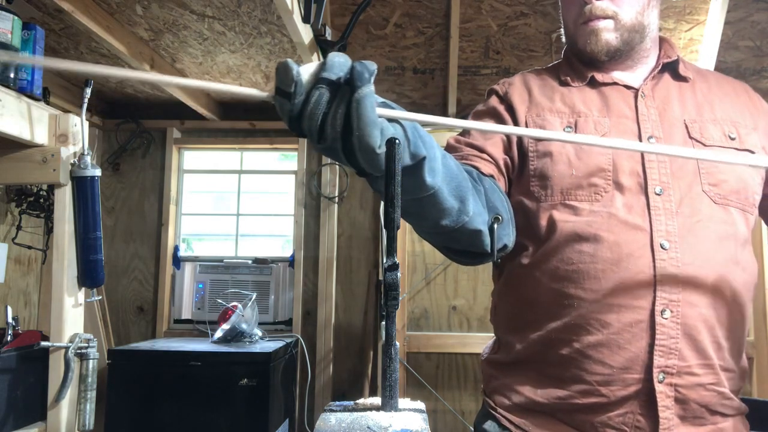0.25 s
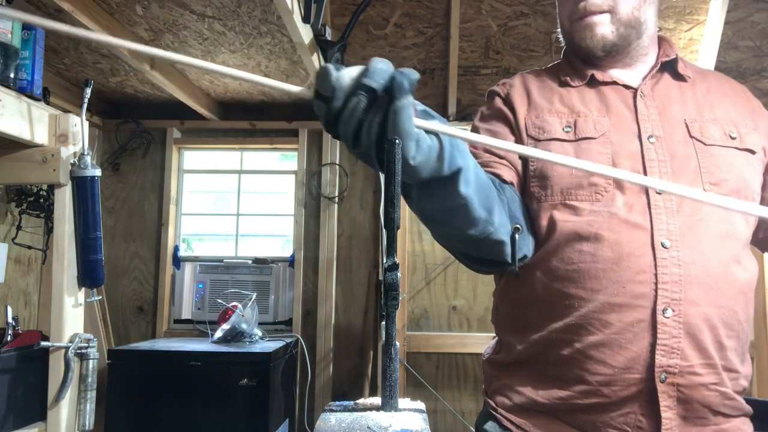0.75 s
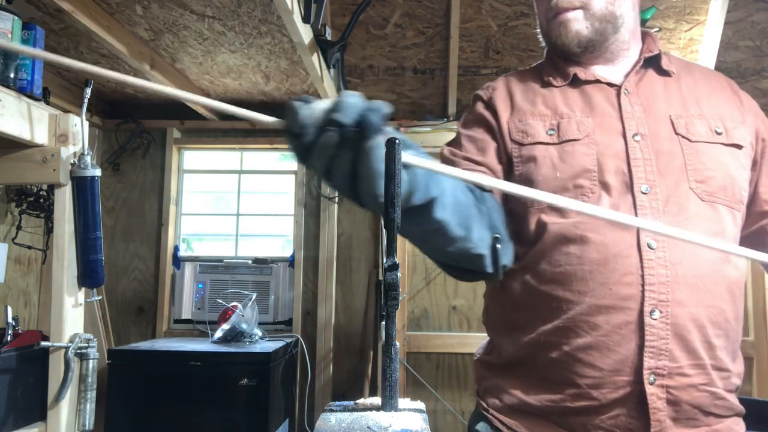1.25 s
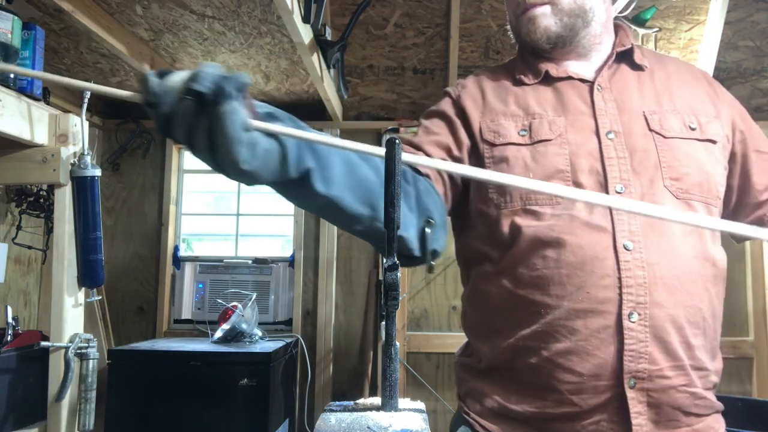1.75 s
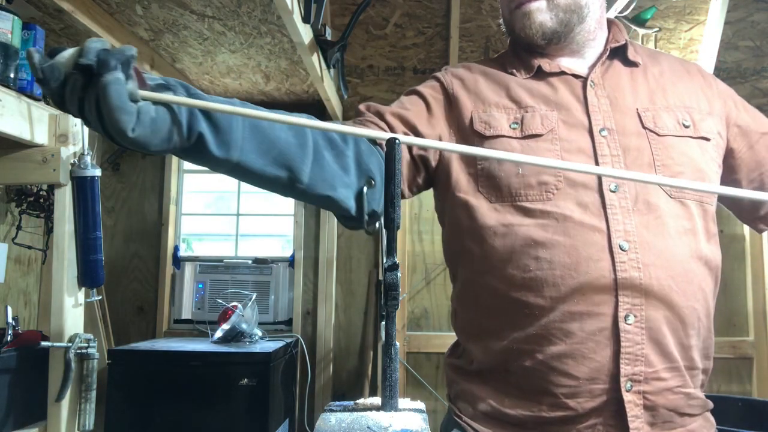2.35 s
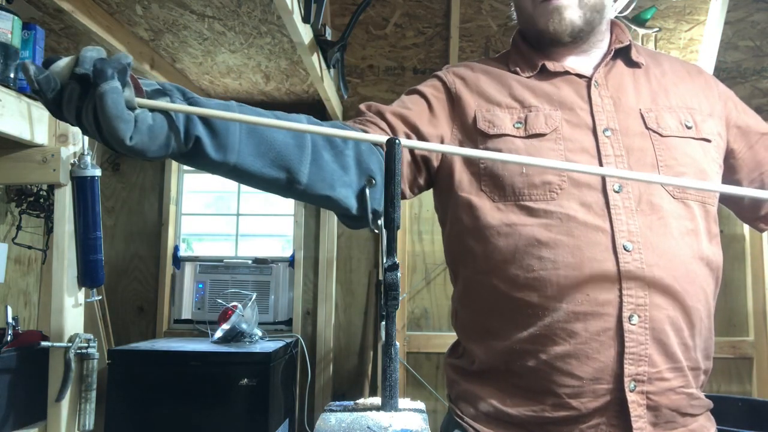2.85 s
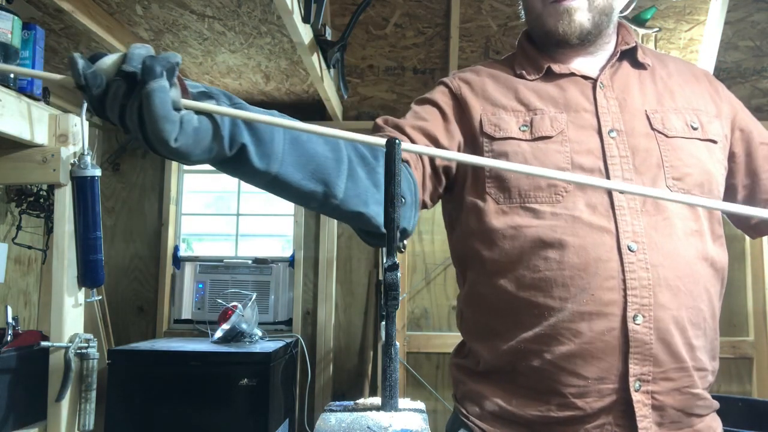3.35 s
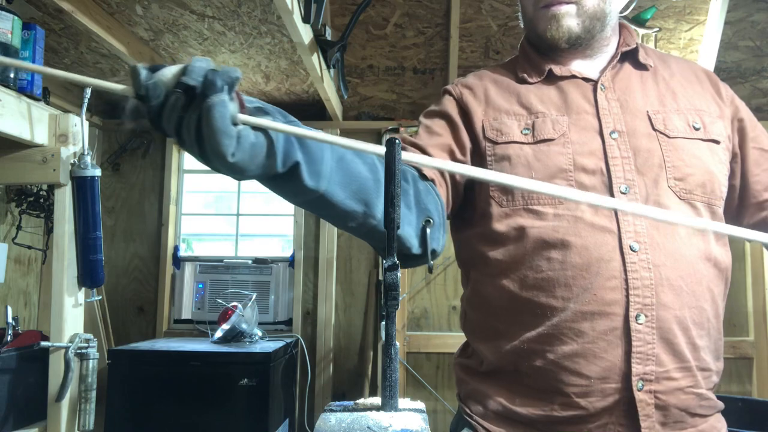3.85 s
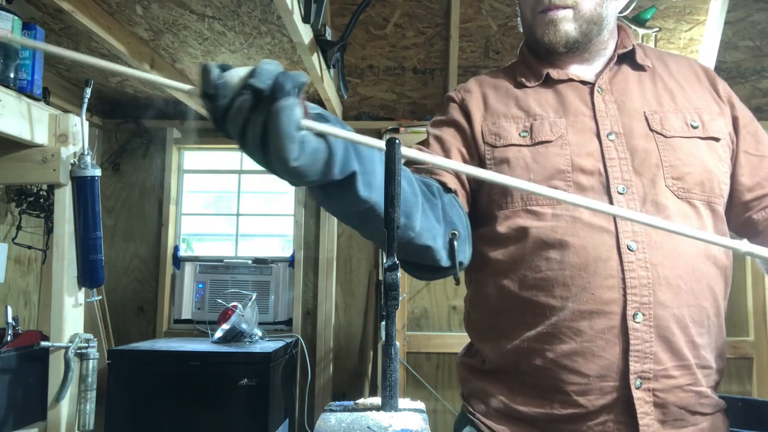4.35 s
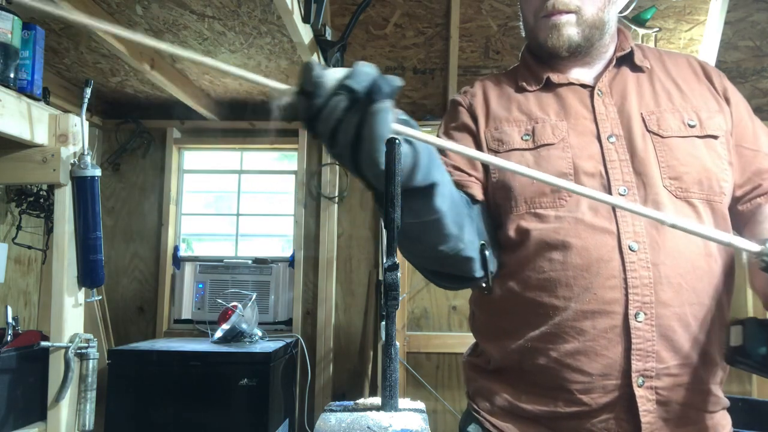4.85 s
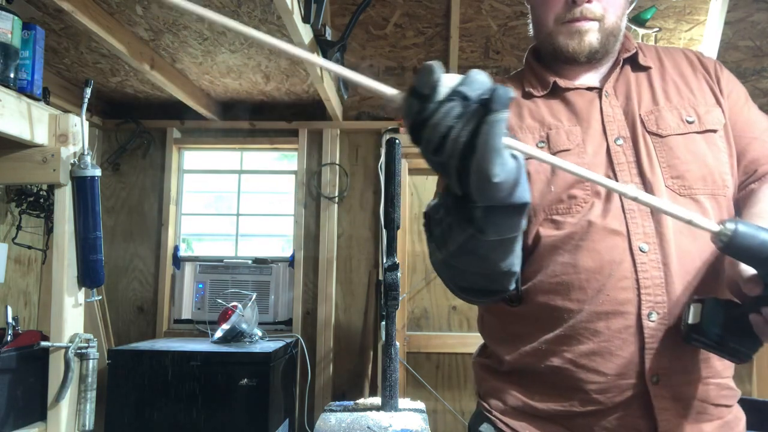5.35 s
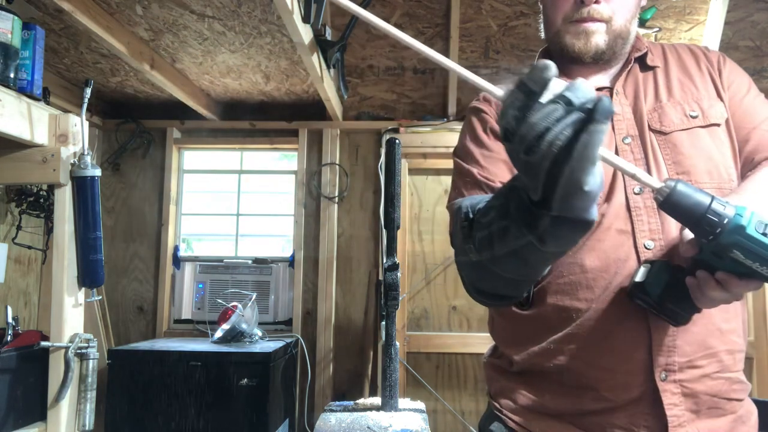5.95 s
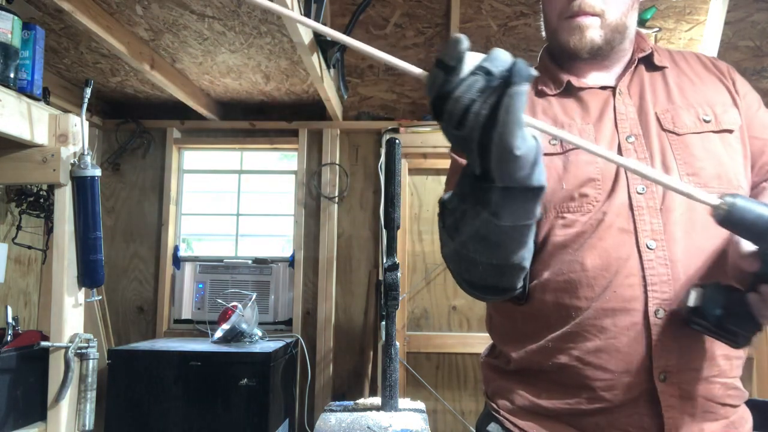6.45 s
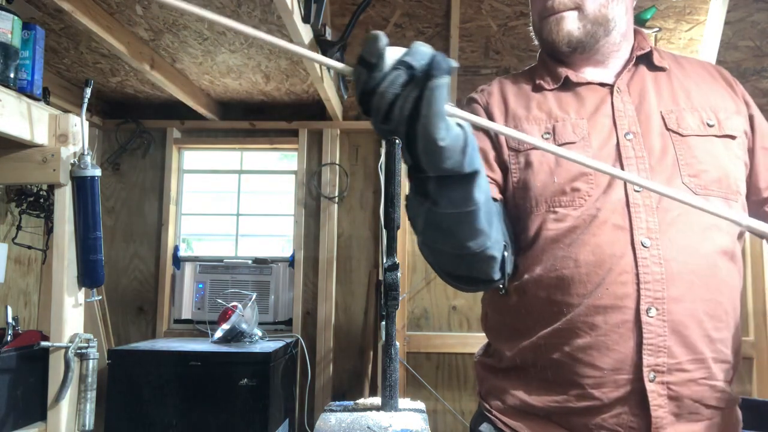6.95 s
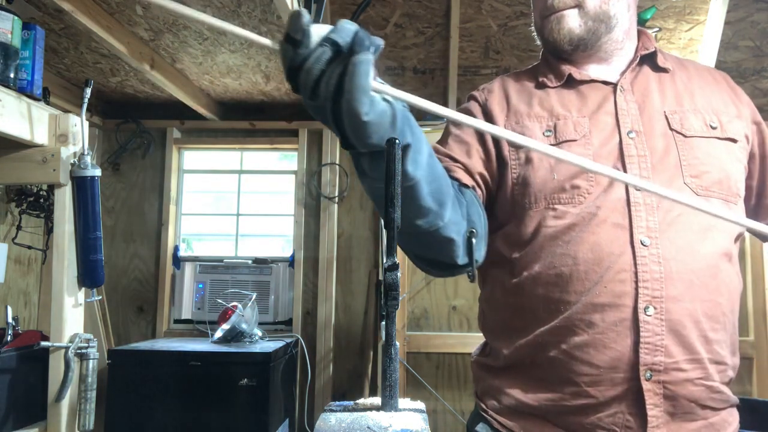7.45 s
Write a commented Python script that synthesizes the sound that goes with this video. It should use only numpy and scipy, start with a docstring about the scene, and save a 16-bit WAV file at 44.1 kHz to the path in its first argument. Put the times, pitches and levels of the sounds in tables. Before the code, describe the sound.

Close up in a small wooden workshop, a short whir of a cordless drill cuts off, and the dowel and chuck tick and knock lightly. With a clack the drill starts again and keeps running, its high gear whine swelling and fading over the gritty hiss and woody rasp of sandpaper sliding along the spinning dowel. A tiny rising chirp passes, and the drill grows a little louder, with a brief shrill scrape.

```python
"""A cordless drill spins a long wooden dowel against sandpaper in a gloved hand, in a small wooden shed.
It stops almost at once; the glove scuffs and the dowel and chuck knock lightly. About a second in,
the gears catch with a clack and run on, whirring and whining with the motor's speed, while the grit
hisses and the wood rasps. A thin chirp rises just after four seconds, and the scrape turns briefly
shrill as the hand nears the chuck."""
import sys
import numpy as np
from scipy import signal
from scipy.fft import rfft, irfft, next_fast_len
from scipy.io import wavfile
from scipy.ndimage import map_coordinates

SR = 44100
rng = np.random.default_rng(int(sys.argv[2]) if len(sys.argv) > 2 else 0)


def transcribe(signal):
    """Save signal, clipped to [-1, 1], as a 16-bit WAV file at the path in sys.argv[1]."""
    frames = np.atleast_2d(signal).T
    limited = np.clip(frames, -1, 1)
    pcm = np.round(limited * 32767).astype(np.int16)
    wavfile.write(sys.argv[1], SR, pcm)


N = 340011

# the motor's pitch at full trigger and its gear-mesh whine: time_s, shaft_hz, whine_db
MOTOR_RUN = [(1.25, 313, -48), (1.6, 316.6, -46), (1.85, 317.8, -37.5), (2.4, 318.8, -37.5),
             (2.68, 320.2, -36.8), (2.92, 316.6, -42.5), (3.2, 316.9, -37.5), (3.62, 315.5, -45),
             (3.8, 314.9, -39.5), (3.95, 314.3, -46), (4.61, 313, -52), (4.68, 313.5, -37),
             (5.2, 314.6, -33), (5.45, 311.8, -37.5), (5.75, 313.7, -42), (6.08, 308.6, -42.5),
             (6.3, 312.2, -39), (6.7, 313.4, -34.3), (7, 312.3, -36), (7.15, 311.6, -48)]
# how squarely the drill's housing faces the listener: time_s, gain_db
FACING = [(0, -4.5), (3.3, -4.5), (4.55, -5), (4.85, 1.5), (5.45, 1.5), (7.7, -4.5)]


def motor():
    """The motor follows the trigger with inertia; gives its share of full speed and its turns so far."""
    # moves of the trigger finger: start_s, speed_share
    trigger = [(-1, .87), (0.3124, 0.0053), (1.1058, 1), (4.5, .885), (4.5, 1)]
    spin_up_s, coast_s = .034, .04
    t = np.arange(N) / SR
    speed, before = np.zeros(N), 0
    for start_s, share in trigger:
        lag_s = spin_up_s if share > before else coast_s
        speed += (share - before) * (1 - np.exp(-np.maximum(t - start_s, 0) / lag_s))
        before = share
    speed = np.clip(speed, 0, 1)
    shaft_hz, _ = curves(MOTOR_RUN)
    return speed, np.cumsum(speed * shaft_hz) / SR


def gearbox(turns):
    """Gear teeth whirr, louder under load, and ring the drill's housing."""
    # tone colour of the teeth: freq_hz, level_db
    gear_colour = [(60, -40), (130, -26.5), (250, -30), (420, -16), (900, -10.5), (1700, -3), (2080, -3.5),
                   (2350, -2), (2800, -1.5), (3500, 0), (4400, 0), (4950, 1), (5700, -1), (6800, -3),
                   (9000, -42)]
    # resonances of the housing: pitch_hz, width_hz, level_db
    housing_modes = [(305, 32, -10), (632, 46, -9.5), (1014, 87, -0.5), (1864, 190, 2), (2744, 98, -4),
                     (3950, 260, -3), (4610, 170, 0.5), (4970, 440, 2)]
    facing_db, = curves(FACING)
    # the teeth strike harder once in each turn of the motor
    beat = amp(0.53 * np.cos(2 * np.pi * turns) + 0.72 * wobble(70))
    whirr = coloured(beat * grains(rate=12000, spread_db=1.0), gear_colour)
    housing = ringing(beat * grains(rate=9000, spread_db=0.5), housing_modes)
    housing = unit(below(housing, corner_hz=9000))
    return amp(pressure_db() - 32) * whirr + amp(facing_db - 35.5) * housing


def whine(turns):
    """Gear mesh, shaft and planets sing at multiples of the motor's speed; backlash makes them flutter."""
    # tones of the motor and planet gears: shaft_multiple, level_db
    orders = [(1, -60.5), (2, -59.5), (2.55, -59), (4, -65), (5, -47), (5.73, -52), (5.8, -50.5),
              (5.93, -50.5), (6, -47.5), (8.6, -55), (13, -63), (21.72, -50), (22.97, -54), (24, -48)]
    teeth = 12
    _, whine_db = curves(MOTOR_RUN)
    facing_db, = curves(FACING)
    flutter_db = 1.3 * wobble(18) + 1.2 * wobble(80)
    slip = .35 * wobble(40) + .1 * wobble(170)
    mesh = amp(whine_db + flutter_db) * np.sin(2 * np.pi * teeth * turns + slip)
    tones = sum(amp(db + 3.2 * wobble(14)) * np.sin(2 * np.pi * order * turns + 0.53 * wobble(22))
                for order, db in orders)
    return np.sqrt(2) * (mesh + amp(facing_db - 2) * tones)


def sanding(speed, turns):
    """Sandpaper scratches the spinning dowel as the hand slides along it."""
    # the hand's place, 0 near the chuck to 1 at arm's length: time_s, reach
    hand_path = [(1.2, .09), (2.2, .95), (3.2, 0.9), (4, 0.55), (5.8, 0.042), (7.7, 0.39)]
    reach, = curves(hand_path)
    # the slightly bent dowel presses on the paper once in each of its geared-down turns
    gear_ratio = 15
    sway_db = 0.5 * np.sin(2 * np.pi * turns / gear_ratio) + 0.41 * wobble(25)
    return amp(sway_db) * (wood_rasp(reach) + paper_hiss(speed, reach) + shrill_scrape())


def wood_rasp(reach):
    """The dowel's bending modes rasp and boom; the hand's place changes which of them ring."""
    # the wood's colour, hand near the chuck: freq_hz, level_db
    near_colour = [(30, -47), (110, -25), (190, -16), (280, -7.5), (380, -17), (650, -2.5), (880, -3.5),
                   (1020, 4.5), (1120, -2), (1250, 7.5), (1480, 0.5), (1750, -1), (2100, -10), (4000, -36)]
    # the wood's colour, hand far out: freq_hz, level_db
    far_colour = [(30, -48), (110, -26), (190, -19.5), (285, -4.5), (400, -15.5), (600, -8), (850, -3),
                  (1000, 2), (1130, -3.5), (1350, 0.5), (1680, 5.5), (2100, -6.5), (2350, 6.5), (2800, -27)]
    # strength of the rasp: time_s, level_db
    rasp = [(0, -34.5), (.25, -31.5), (1.2, -31), (1.48, -30.6), (2.1, -36.5), (2.85, -32), (3.1, -34),
            (4.25, -29.5), (4.6, -32.4), (4.9, -31.5), (5.1, -34), (5.4, -30.7), (5.78, -34), (6, -31),
            (7.03, -38), (7.35, -34)]
    normal_db = -33
    rasp_db = curves(rasp)[0] - normal_db
    near = coloured(grains(rate=7000, spread_db=1.5), near_colour)
    far = coloured(grains(rate=7000, spread_db=1.5), far_colour)
    chatter = amp(.6 * wobble(30))
    dowel = chatter * (np.sqrt(1 - reach) * near + np.sqrt(reach) * far)
    # the dowel rings more freely far from the chuck
    wood_db = -38.5 + 1.23 * rasp_db + 2.5 * reach
    # its lowest modes boom almost regardless of the rasp
    boom = below(dowel, corner_hz=540)
    boom_db = -37.5 + .3 * rasp_db + 2 * reach
    return amp(wood_db) * (dowel - boom) + amp(boom_db) * boom


def paper_hiss(speed, reach):
    """Grit and fine dust hiss, louder under pressure; a quicker dowel sounds brighter."""
    # the grit's coarse hiss: freq_hz, level_db
    grit_colour = [(2000, -33.5), (5000, -20.5), (5900, -4), (6300, 1), (6850, 2), (7450, -1.5),
                   (7950, -6.5), (8200, -11.5), (9500, -32)]
    # the dust's fine hiss: freq_hz, level_db
    dust_colour = [(5000, -43), (8200, 2), (9000, 2.5), (9500, 4.5), (10400, 3.5), (11000, -1),
                   (12100, -10), (13700, -12), (15700, -37)]
    press_db = pressure_db()
    grit_db = -33.5 + 1.05 * press_db + 0.43 * wobble(50)
    dust_db = -45.4 + .7 * press_db + 2 * reach  # shaded when the hand is near the body
    grit = amp(grit_db) * coloured(grains(rate=9000, spread_db=1.0), grit_colour)
    dust = amp(dust_db) * coloured(grains(rate=16000, spread_db=2.0), dust_colour)
    return speed ** 0.52 * grit + speed * dust


def shrill_scrape():
    """The scrape rings one high resonance as the hand nears the chuck."""
    # the shrill swell: middle_s, length_s, level_db
    swell = [(5.53, .7, -34.5)]
    # its resonance: pitch_hz, width_hz, level_db
    mode = [(5000, 420, 0)]
    scrape = ringing(grains(rate=9000, spread_db=3.0), mode)
    return swells(swell) * unit(below(scrape, corner_hz=9000))


def pressure_db():
    """How hard the hand presses the paper on, in dB above normal."""
    # the hand's pressure: time_s, level_db
    pressure = [(0, -28.5), (.3, -29.5), (1.2, -26.5), (1.58, -25.5), (2.1, -30), (2.62, -31.5),
                (2.85, -30.5), (3.75, -28), (4.2, -27.5), (4.55, -29), (4.78, -27.5), (5.15, -29),
                (7.1, -29.5), (7.5, -28)]
    normal_db = -29
    return curves(pressure)[0] - normal_db


def gear_clack():
    """The gears take up their slack with a clack, and the teeth chatter on after it."""
    # resonances of the catching gears: pitch_hz, width_hz, level_db
    clack_modes = [(650, 220, -1), (1400, 450, 2), (2050, 360, 4.5), (5000, 1500, -14), (6760, 830, -14)]
    start_s, muffle_hz = 1.0878, 5500
    strike = amp(5.5) * burst(start_s, t60_s=.012)
    rattle = amp(4) * burst(start_s, t60_s=.2)
    clack = ringing(strike + rattle, clack_modes)
    return filtered(clack, lambda hz: 1 / (1 + (hz / muffle_hz) ** 2))  # the gear case dulls the top


def knocks():
    """Dowel and chuck knock lightly while the drill rests: a bright tick, a dry crack and a low body."""
    # the knocks: start_s, strength_db, body_gain_db
    hits = [(.447, -46, -18), (.471, -36, -24), (.478, -41, -16), (.507, -46, -18), (.548, -33.5, -16),
            (.566, -46, -18), (.676, -58, -7), (.689, -46, -14), (0.736, -43, -20), (0.987, -66, -4)]
    # the tick's resonances: pitch_hz, width_hz, level_db
    tick_modes = [(2600, 380, -5), (4960, 210, 4), (6120, 160, 1), (7000, 220, 1), (7600, 250, -6),
                  (9400, 380, -9)]
    # the crack's colour: freq_hz, level_db
    crack_colour = [(500, -12), (2500, -2), (7500, 0), (11000, -10), (15000, -28)]
    # the body's resonances: pitch_hz, width_hz, level_db
    body_modes = [(620, 120, -8), (1020, 100, 7.5), (1500, 250, 2), (1950, 250, 5)]
    blows, body_blows = np.zeros(N), np.zeros(N)
    for start_s, strength_db, body_gain_db in hits:
        blow = amp(strength_db) * burst(start_s, t60_s=0.0097)
        blows += blow
        body_blows += amp(body_gain_db) * blow
    tick = amp(22.5) * ringing(blows, tick_modes)
    crack = amp(11.5) * filtered(blows, lambda hz: amp(along(crack_colour, hz)))
    body = amp(34.5) * ringing(body_blows, body_modes)
    return tick + crack + body


def glove_scuffs():
    """The paper scuffs faintly on the resting dowel as the glove shifts its grip."""
    # shifts of grip: middle_s, length_s, level_db
    shifts = [(.5, 0.27, -58), (.72, .13, -65), (1.02, .07, -74)]
    # the scuff's colour: freq_hz, level_db
    scuff_colour = [(200, -7), (700, -1), (2000, -8), (3000, -13), (7000, -6), (12000, -29)]
    friction = amp(2.8 * wobble(59.7)) * grains(rate=1700, spread_db=1.5)
    return swells(shifts) * coloured(friction, scuff_colour)


def chirp():
    """A thin, brief tone climbs away above the mesh whine."""
    # the chirp's swell: middle_s, length_s, level_db
    swell = [(4.35, .14, -41)]
    middle_s, middle_hz, rise_hz_per_s = swell[0][0], 4080, 2800
    hz = middle_hz + rise_hz_per_s * (np.arange(N) / SR - middle_s)
    phase = 2 * np.pi * np.cumsum(hz) / SR + .5 * wobble(120)
    return swells(swell) * np.sqrt(2) * np.sin(phase)


def shed_echo(x):
    """Close wooden walls answer; the echo crossfades from tail to tail as the worker moves."""
    # the shed's decay: freq_hz, t60_s
    decay = [(150, 0.25), (1500, 0.2), (6000, 0.1), (14000, 0.32)]
    tail_count, delay_samples = 16, 130
    hz, t, noise = signal.stft(rng.standard_normal((tail_count, SR // 3)), SR, nperseg=256)
    fade = amp(-60 * t / along(decay, hz)[:, None])
    _, tails = signal.istft(noise * fade, SR, nperseg=256)
    tails /= np.linalg.norm(tails, axis=1, keepdims=True)
    place = np.linspace(0, tail_count - 1, N)
    shares = np.sqrt(np.clip(1 - np.abs(place - np.arange(tail_count)[:, None]), 0, 1))
    delayed = np.pad(x, (delay_samples, 0))[:N]
    return signal.oaconvolve(shares * delayed, tails, axes=1).sum(axis=0)[:N]


def room_tone():
    """Still air in the shed, with a steady hum and a faint whistle."""
    # hum and whistle: pitch_hz, level_db
    tones = [(107.7, -80.5), (8683, -96), (9090, -100)]
    # the air's colour: freq_hz, level_db
    air_colour = [(25, -35), (58, -3), (85, -7), (106, -7.5), (160, -9.5), (264, -9), (600, -10.5),
                  (1200, -16.5), (2780, -25.5), (6720, -24), (8000, -29), (10500, -34), (15000, -41)]
    t = np.arange(N) / SR
    hum = sum(amp(db) * np.sqrt(2) * np.sin(2 * np.pi * hz * t + .5 * wobble(10)) for hz, db in tones)
    return hum + amp(-68.5) * coloured(rng.standard_normal(N), air_colour)


def grains(rate, spread_db):
    """Random tiny impacts of uneven size, rate a second, at rms 1."""
    hit = rng.random(N) < rate / SR
    return unit(hit * rng.standard_normal(N) * amp(spread_db * rng.standard_normal(N)))


def burst(start_s, t60_s):
    """A decaying burst of contact noise, at energy 1."""
    t = np.arange(N) / SR - start_s
    x = (t >= 0) * amp(-60 * np.clip(t / t60_s, 0, 10)) * rng.standard_normal(N)
    return x / np.linalg.norm(x)


def swells(rows):
    """Gain of smooth swells, each 12 dB down at its two ends."""
    t = np.arange(N) / SR
    return sum(amp(db - 12 * (2 * (t - middle_s) / length_s) ** 2) for middle_s, length_s, db in rows)


def wobble(rate):
    """A smooth random curve, rate knots a second."""
    knots = rng.standard_normal(int(N * rate / SR) + 4)
    return map_coordinates(knots, [np.arange(N) * rate / SR])


def curves(rows):
    """One value per sample for each column after the time."""
    time_s, *columns = np.transpose(rows)
    return [np.interp(np.arange(N) / SR, time_s, column) for column in columns]


def along(points, hz):
    """Read (freq_hz, value) points at hz, on a log axis."""
    freq_hz, values = np.transpose(points)
    return np.interp(np.log(hz + 1), np.log(freq_hz + 1), values)


def filtered(x, response):
    """x through a complex frequency response."""
    size = next_fast_len(N + SR // 2)
    return irfft(rfft(x, size) * response(np.fft.rfftfreq(size, 1 / SR)), size)[..., :N]


def coloured(x, colour):
    """x shaped by a spectrum, at rms 1."""
    return unit(filtered(x, lambda hz: amp(along(colour, hz))))


def ringing(x, modes):
    """x through parallel resonances of alternating polarity."""
    def response(hz):
        return sum((-1) ** k * amp(db) * 1j * hz * width / (pitch ** 2 - hz ** 2 + 1j * hz * width)
                   for k, (pitch, width, db) in enumerate(modes))
    return filtered(x, response)


def below(x, corner_hz):
    """x with its treble cut off steeply."""
    return filtered(x, lambda hz: 1 / (1 + (hz / corner_hz) ** 6))


def amp(db):
    """Decibels to gain."""
    return 10 ** (np.asarray(db) / 20)


def unit(x):
    """Scale to rms 1."""
    return x / np.sqrt(np.mean(x ** 2) + 1e-20)


def scene():
    """The trigger sets the speed, and the speed sets pitch and loudness; both channels are the same."""
    speed, turns = motor()
    drive = speed ** 1.15
    direct = drive * (gearbox(turns) + sanding(speed, turns)) + knocks() + gear_clack() + glove_scuffs()
    mix = direct + amp(-8.5) * shed_echo(direct) + drive * whine(turns) + chirp() + room_tone()
    return np.array([mix, mix])


def record(dry):
    """Roll off the deepest bass and cut the very top."""
    bass_hz, top_hz = 42, 15740
    return filtered(dry, lambda hz: (hz < top_hz) * hz ** 2 / np.sqrt(hz ** 4 + bass_hz ** 4))


dry = scene()
out = record(dry)
transcribe(out)
```